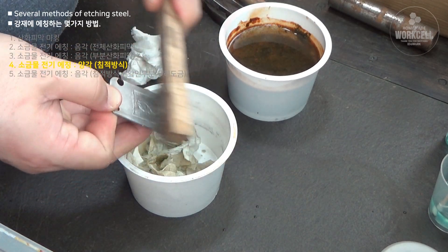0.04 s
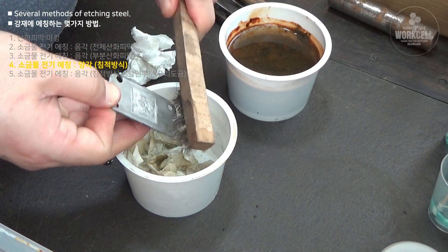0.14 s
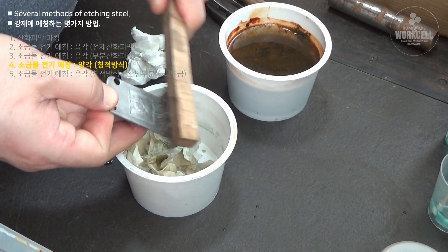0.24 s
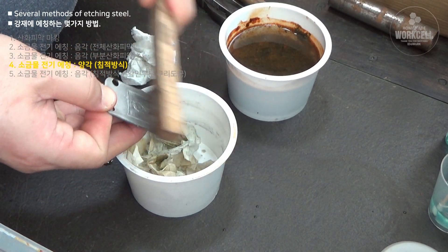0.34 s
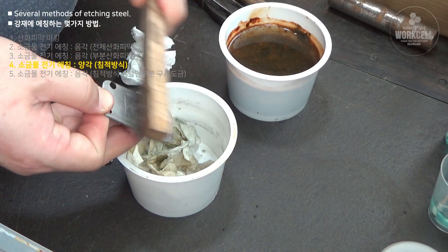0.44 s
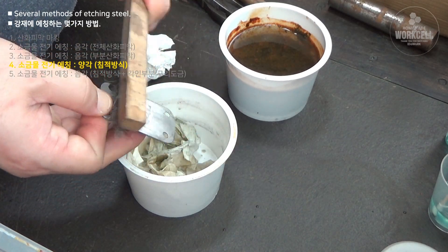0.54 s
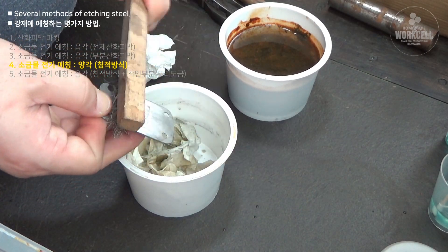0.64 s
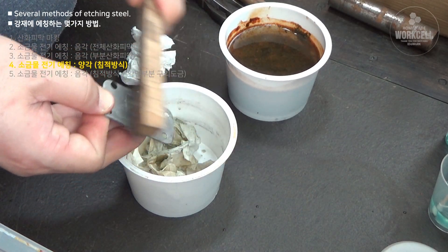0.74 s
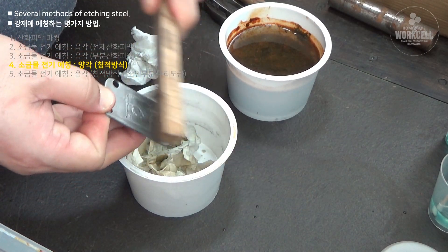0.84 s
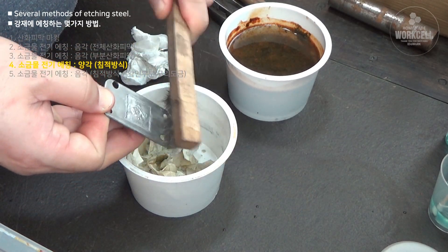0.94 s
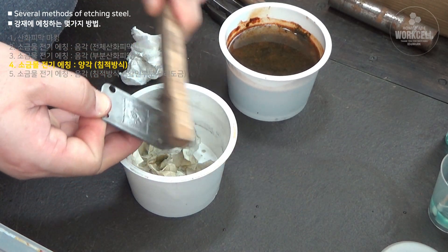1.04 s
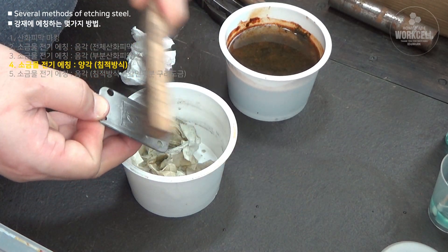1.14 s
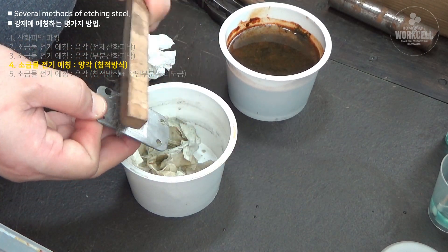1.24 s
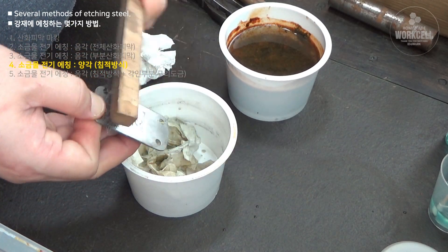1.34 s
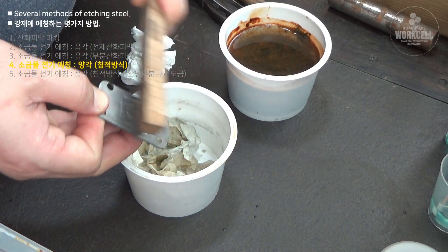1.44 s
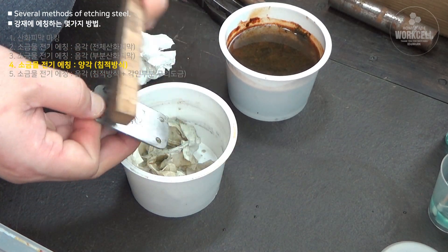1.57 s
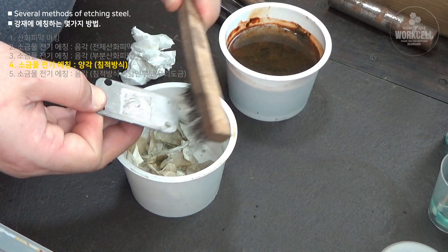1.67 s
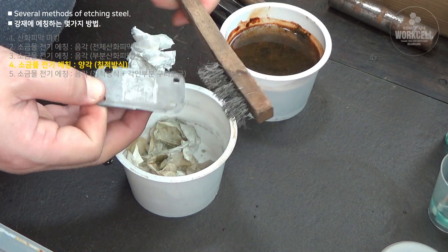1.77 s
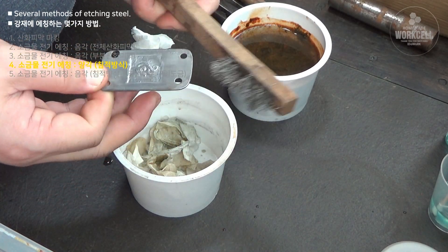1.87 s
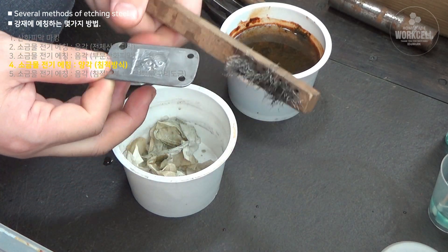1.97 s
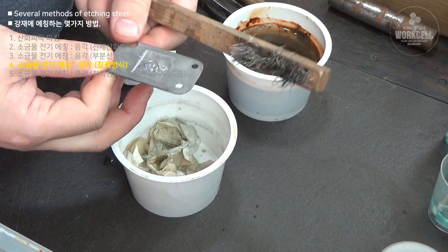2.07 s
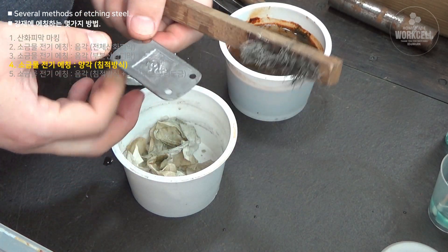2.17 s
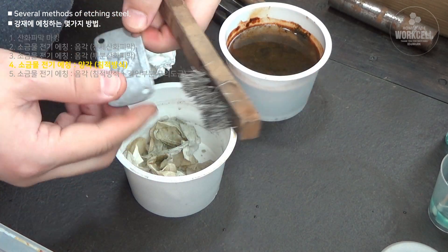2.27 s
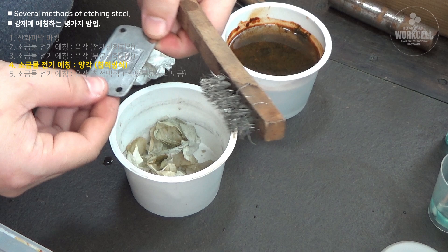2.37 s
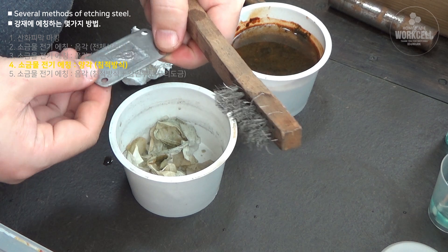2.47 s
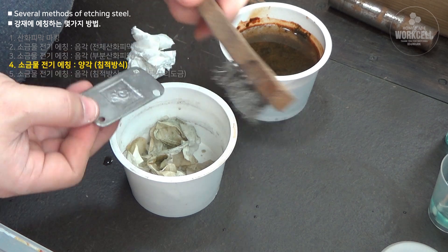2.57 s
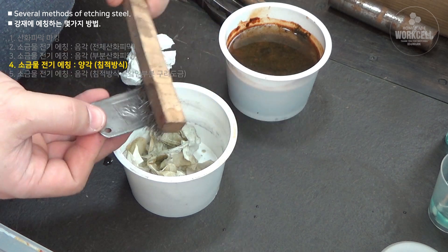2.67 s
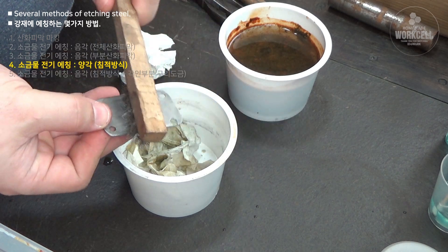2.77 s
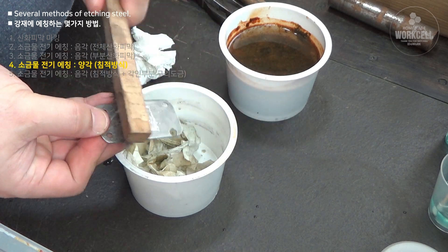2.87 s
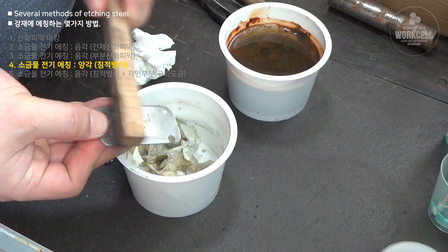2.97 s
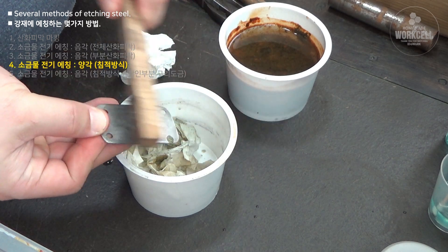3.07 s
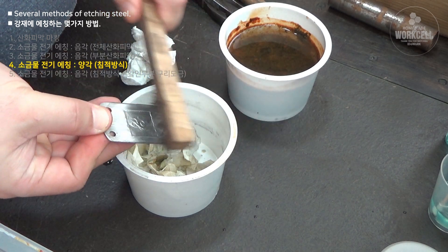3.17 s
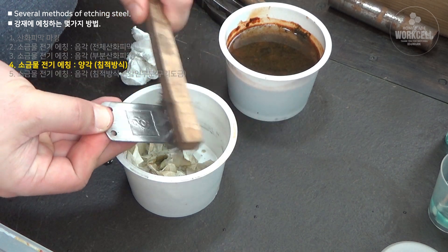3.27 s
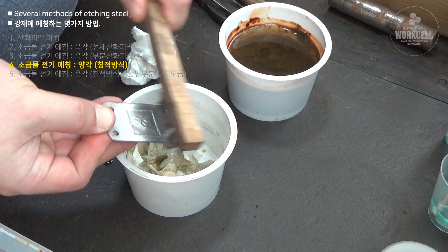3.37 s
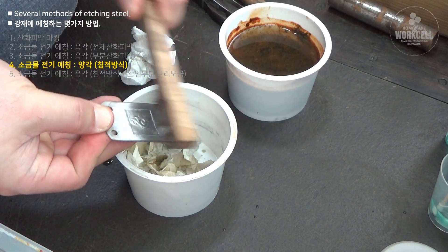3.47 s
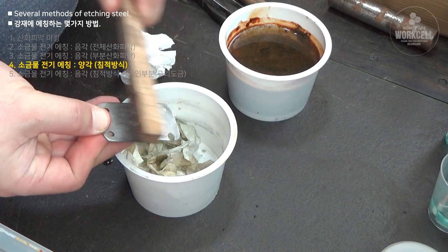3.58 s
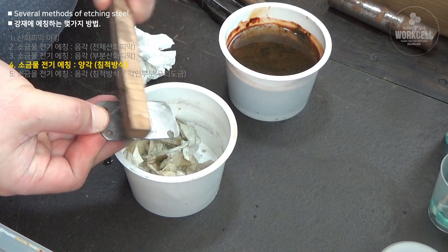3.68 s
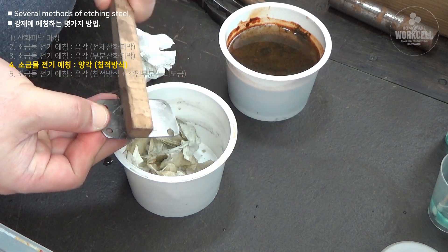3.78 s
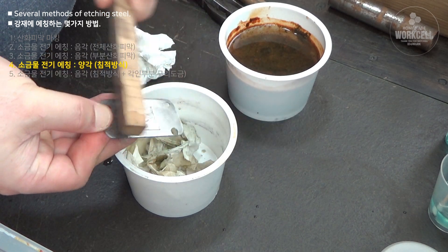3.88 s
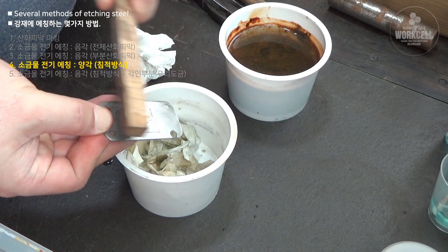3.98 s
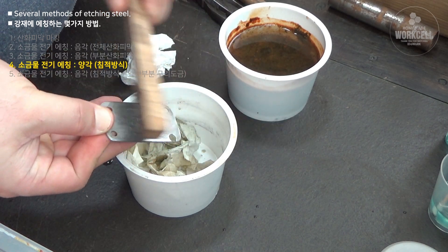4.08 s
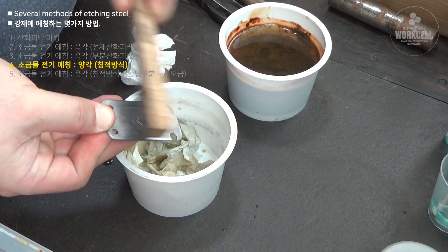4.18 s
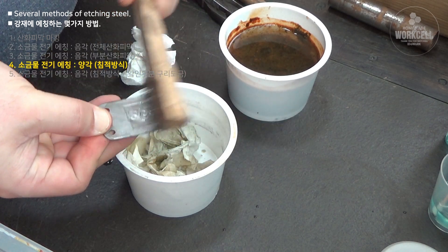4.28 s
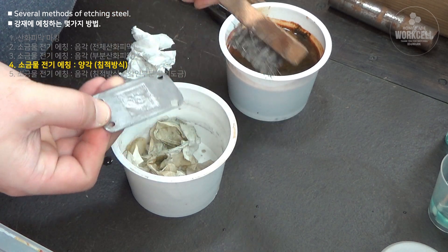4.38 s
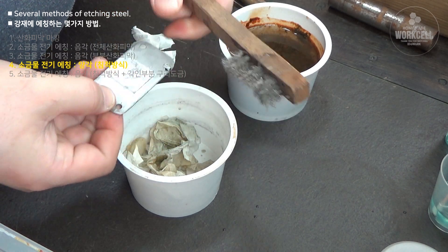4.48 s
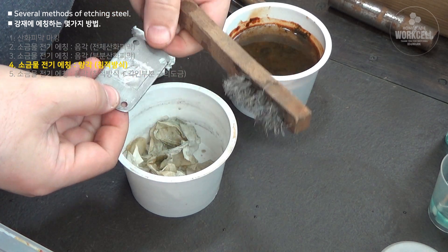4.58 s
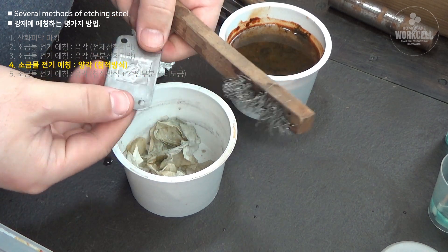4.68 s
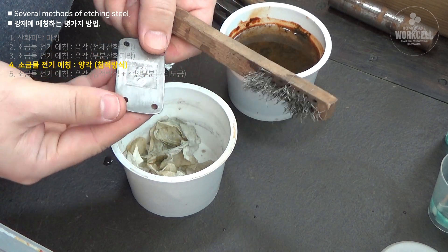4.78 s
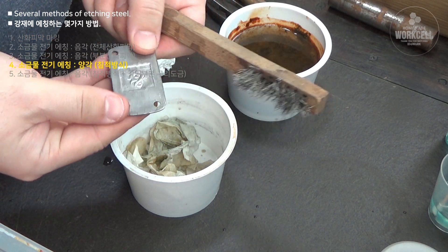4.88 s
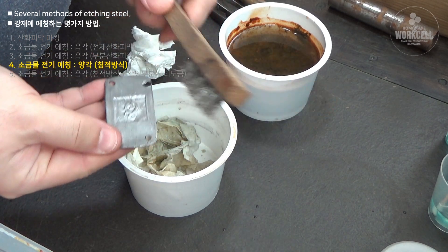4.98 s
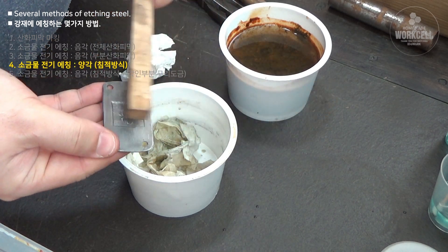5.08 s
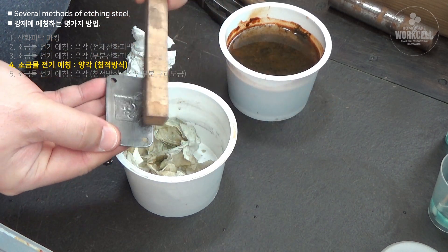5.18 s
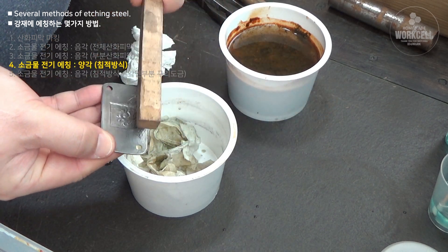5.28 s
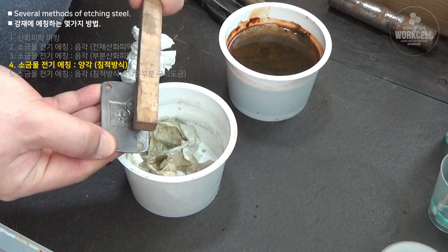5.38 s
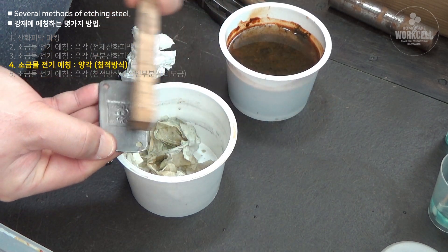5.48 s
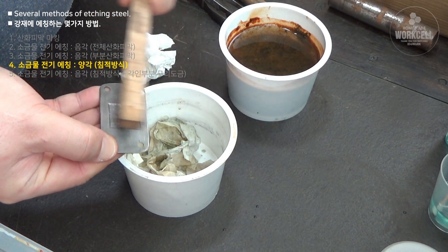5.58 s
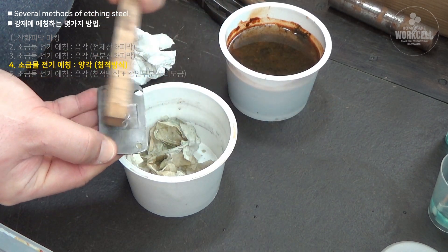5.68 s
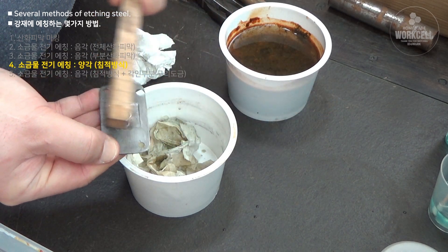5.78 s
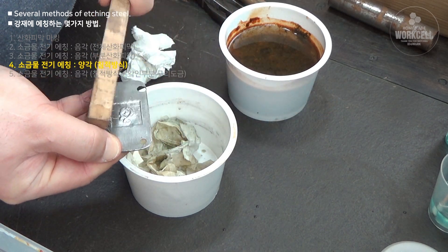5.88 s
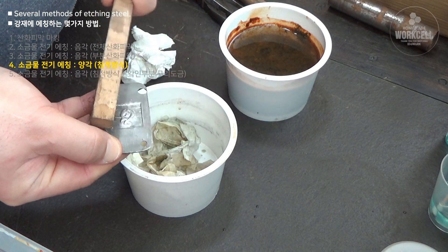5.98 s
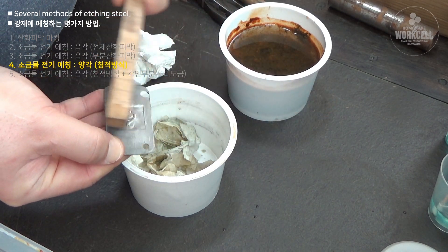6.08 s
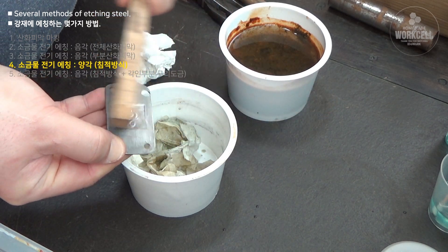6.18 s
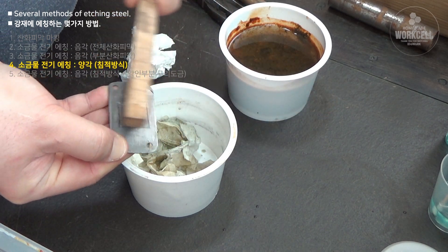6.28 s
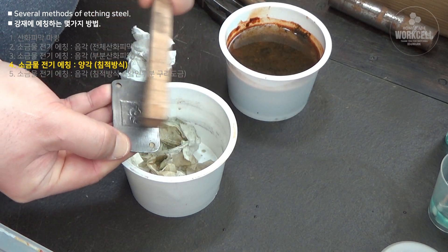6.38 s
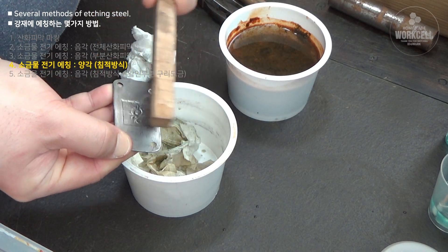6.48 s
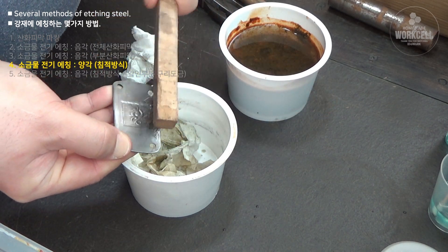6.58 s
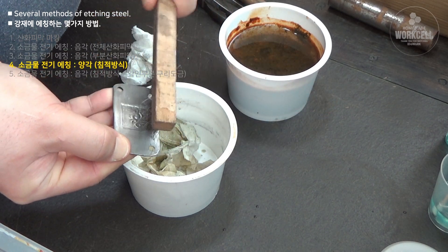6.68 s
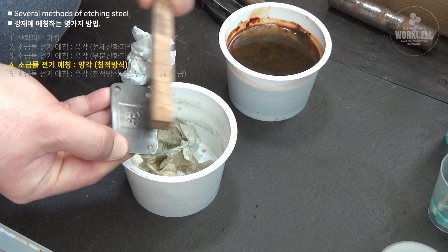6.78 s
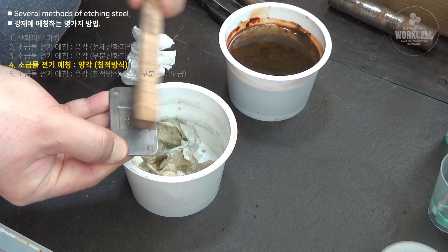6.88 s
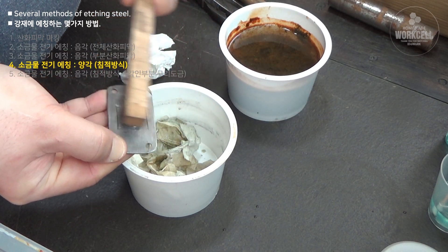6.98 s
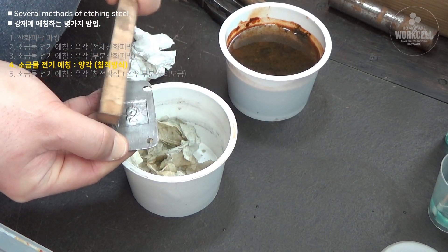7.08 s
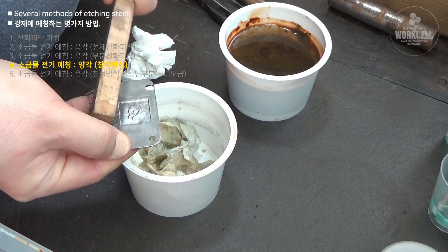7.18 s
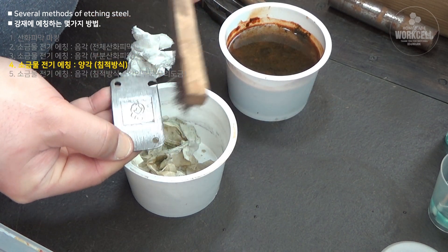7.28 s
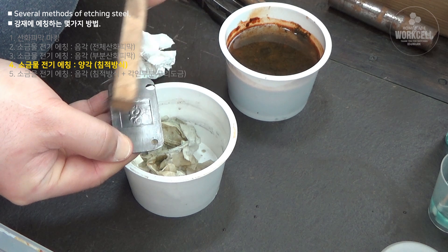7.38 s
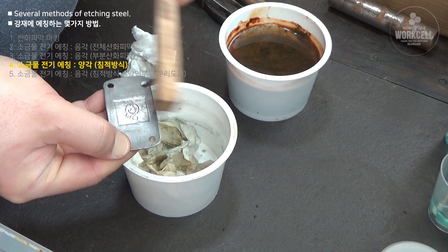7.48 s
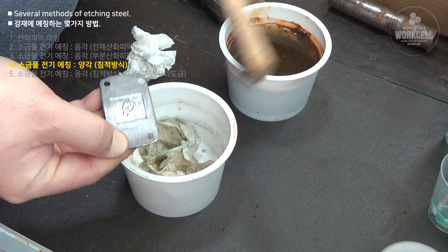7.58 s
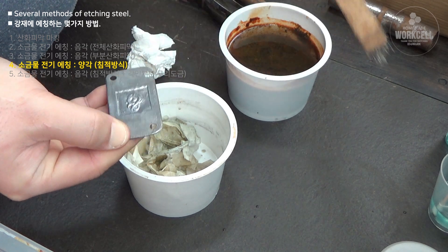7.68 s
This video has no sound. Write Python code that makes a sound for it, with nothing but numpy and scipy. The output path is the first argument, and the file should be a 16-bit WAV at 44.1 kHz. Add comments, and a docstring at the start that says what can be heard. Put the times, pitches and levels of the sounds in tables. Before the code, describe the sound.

In a small, dry workshop, a wire brush scrubs a hand-held steel plate close to the microphone, slightly left. From 0 to 1.7 s, rapid even pushes and pulls, about eighteen strokes a second, make a bright, grainy, sizzling rasp with sharp wire catches. Wires flick as the brush lifts; a tiny motor clicks on near 1.9 s and ticks very faintly to the end. A soft wooden knock comes at 2.5 s, then wire flicks and a thin twang at 2.7 s. Scrubbing resumes from 2.8 to 4.3 s, slightly different in colour. Another pause holds quiet airy hiss, faint hum and a barely audible distant whine, present about 3.7-5.2 s. The third bout runs 5.1 to 7.3 s, with a strong snap near 7.1 s, then two short separate swipes at 7.4 and 7.55 s with light handle taps.

```python
"""Workshop: a wire brush scrubs a small hand-held steel plate in three bouts, about eighteen strokes a second.
Even runs of pushes and pulls; wire tips slip and snap free as clicks, coloured anew by each grip on the plate.
Tuft and free wires ring high; stray wires flick or twang; the handle knocks lightly as damped noise.
Partway in, a tiny motor clicks on and ticks into its resonant housing to the end.
Beneath lie coloured-noise air, a faint hum and, later, a thin far-off whine."""
import sys
import numpy as np
from scipy import signal
from scipy.fft import rfft, irfft
from scipy.io import wavfile
from scipy.ndimage import map_coordinates

SR = 44100
rng = np.random.default_rng(int(sys.argv[2]) if len(sys.argv) > 2 else 0)


def bounce(signal):
    """Save signal as a 16-bit WAV file at the path given by the first command-line argument."""
    frames = np.transpose(np.atleast_2d(signal))
    limited = np.clip(frames, -1, 1)
    pcm = np.round(limited * 32767).astype(np.int16)
    wavfile.write(sys.argv[1], SR, pcm)


N = 340967

# air noise density: freq_hz, rel_density_db
AIR_SPECTRUM = [(30, -52), (100, -15.5), (170, -14), (240, -2.5), (400, -8), (1000, 1), (2000, 0.5),
                (2700, 0.5), (3300, -6), (4800, -7), (6000, -10.5), (9000, -14.5), (15700, -17.5),
                (17000, -26)]
# air level over time: time_s, rel_level_db
AIR_LEVEL = [(0.0, -52.5), (0.04, -58), (0.36, -55), (1.2, -58), (1.46, -54.5), (2.73, -58.5),
             (2.93, -55.5), (2.95, -63), (3.1, -58), (4.52, -55.5), (5.19, -57.5), (5.38, -55.5),
             (6.91, -57), (7.19, -55), (7.23, -60.5), (7.73, -56.5)]
# resonances in the air's rush: freq_hz, width_hz, lift_db
DUCT_MODES = [(249, 64, 6), (431.8, 29, 10), (475, 38, 8.5), (579.2, 20.5, 11), (654, 13, 5.9),
              (1127, 18, 3.5), (1670, 24, 5.5), (1845, 55, 6.5), (2726, 21, 2)]
# room hum: freq_hz, level_db
HUM = [(311, -75)]
# left-right likeness of the air: freq_hz, likeness_0_to_1
LIKENESS = [(60, 1), (380, 1), (950, 0.87), (2380, 0.58), (6000, 0.35), (15000, 0.98)]
# runs of to-and-fro strokes, each from a push: start_s, end_s, stroke_count, rel_level_db, push_over_pull_db,
# push_share_of_cycle, pull_lean (over 1 peaks late), tuft_ring_db, rel_catch_db (wire catch at each push)
RUNS = [(0.008, 0.687, 12, -30, -0.01, 0.52, 0.91, 1.3, -29),
        (0.688, 1.509, 14, -29.5, 0.93, .47, 1.1, 2.3, -23),
        (1.512, 1.621, 2, -29, 0.33, 0.47, 1.07, 2.2, -22), (2.81, 3.145, 6, -31, 1.5, .49, 0.9, 2.5, -25),
        (3.147, 3.986, 15, -30, 0.8, 0.51, 0.98, 0.3, -28),
        (3.985, 4.243, 5, -29.5, 0.5, .47, 1.1, 2.6, -28), (5.115, 5.322, 4, -32.5, 0.97, 0.47, 1, 1, -25),
        (5.322, 5.977, 12, -29.3, 1.7, 0.49, 0.77, 2.8, -29),
        (5.978, 7.062, 20, -29.5, 1.6, 0.46, 0.58, 1.8, -31),
        (7.058, 7.296, 4, -29.7, 0.7, 0.51, 1.04, 2.4, -31)]
# brush landing, leaving, grazing: start_s, length_s, rel_level_db, tuft_ring_db, lean (over 1 peaks late)
LONE_STROKES = [(1.625, 0.076, -28.5, 3, 0.77), (1.825, 0.039, -59, -12, 1), (1.93, 0.07, -60, -7, 1),
                (2.615, 0.052, -59, 0, 1), (2.745, 0.056, -36, 0, 0.67), (4.25, 0.062, -33.5, 1, 0.89),
                (4.356, 0.05, -58, -3, 1), (7.436, 0.054, -28.5, 5.5, 1), (7.554, 0.043, -29.5, 1, 0.84),
                (7.65, 0.1, -59, -10, 1)]
# wires snagging, or flicking as the brush lands and lifts: time_s, rel_level_db
FLICKS = [(0.7024, -17), (1.052, -19), (1.4032, -21), (1.712, -24.5), (1.721, -30), (1.7544, -41),
          (1.8073, -41), (1.8986, -42), (2.709, -32), (2.7197, -40), (3.9943, -17), (4.154, -18),
          (4.209, -30), (4.3405, -38), (4.3854, -36), (5.1048, -21.5), (5.126, -28), (5.165, -22),
          (7.1277, -10), (7.4324, -21), (7.551, -28), (7.7087, -37)]
# friction noise density of the wire tips: freq_hz, rel_density_db
FRICTION_SPECTRUM = [(40, -21.5), (90, -22.5), (135, -16), (300, -30.5), (1500, -19.5), (3000, -16.5),
                     (4200, -11), (5500, -7.5), (8000, -5.5), (10500, -4.5), (13000, 1), (15700, 4),
                     (17000, -3)]
# tuft and plate resonances, first grip: freq_hz, width_hz, lift_db
FIRST_GRIP = [(5282, 649, 5.8), (6700, 1400, 5.3), (8852, 1400, 7.4), (9836, 372, 9.1), (10867, 1400, 11.5),
              (12586, 819, 11.5)]
# second grip, with bass weight: freq_hz, width_hz, lift_db
SECOND_GRIP = [(50, 240, -4), (4121, 625, 3.4), (6322, 914, 5.0), (8002, 1400, 8.5), (9767, 1316, 11.2),
               (11104, 1042, 10.3), (12426, 536, 8.6)]
# third grip, with bass weight: freq_hz, width_hz, lift_db
THIRD_GRIP = [(60, 140, 3), (5173, 474, 5.9), (6400, 690, 4.2), (7734, 545, 3.6), (9984, 1400, 12.7),
              (11271, 1229, 5.8), (12441, 660, 14.0), (14105, 200, 2.3)]
# plate turned in the hand: time_s
REGRIP_S = [2.3, 4.8]
# motor running: time_s, ticks_per_s, level_db
MOTOR_RUN = [(1.92, 55, -68.5), (2.68, 46, -72), (4.35, 48, -69), (5.08, 53, -71.5), (7.7, 31, -69.5)]
# motor housing resonances: freq_hz, rel_level_db, t60_s
HOUSING_MODES = [(4950, 10, 0.035), (6250, 16, 0.027), (6390, 8, 0.035), (6850, 9, 0.033)]
# wooden handle knocks: time_s, rel_level_db, centre_hz
KNOCKS = [(2.501, -40, 1300), (5.71, -41, 1060), (7.434, -47, 595), (7.553, -42, 813)]
# stray wire plucked on the plate's edge: time_s, rel_level_db
PLUCKS = [(2.708, -49), (2.72, -45), (2.752, -38), (4.302, -49)]
# the stray wire's two bending planes: freq_hz, rel_level_db, t60_s
STRAY_WIRE_MODES = [(12600, 0, 0.11), (12770, -3, .11)]
# far-off whine: time_s, pitch_hz, level_db
WHINE = [(3.6, 643, -91), (3.8, 655, -67), (4.2, 658, -70), (4.3, 704, -68), (4.9, 698, -66),
         (5.3, 743, -90)]

TIME_S = np.arange(N) / SR
GRID_HZ = np.maximum(np.fft.rfftfreq(8192, 1 / SR), 1)


def from_db(db):
    """Decibels to amplitude gain."""
    return 10 ** (np.asarray(db) / 20)


def rms_one(x):
    """Scale to rms 1."""
    return x / np.sqrt(np.mean(x ** 2) + 1e-20)


def in_time(rows):
    """Interpolate each column of a time curve at every sample."""
    time_s, *columns = np.transpose(rows)
    return [np.interp(TIME_S, time_s, column) for column in columns]


def at_hz(points, hz):
    """Read a spectrum on a log-frequency axis."""
    point_hz, values = np.transpose(points)
    return np.interp(np.log(hz), np.log(point_hz), values)


def response(spectrum, resonances):
    """Gain on GRID_HZ of a spectrum lifted by resonances; keeps the power of white noise."""
    lift_db = sum(db / (1 + (2 * (GRID_HZ - hz) / width_hz) ** 2) for hz, width_hz, db in resonances)
    return rms_one(from_db(at_hz(spectrum, GRID_HZ) + lift_db))


def colour(x, gain):
    """Minimum-phase filter with the given gain on GRID_HZ, built by folding the cepstrum."""
    cepstrum = irfft(np.log(gain + 1e-9))
    cepstrum[1:len(gain) - 1] *= 2
    cepstrum[len(gain):] = 0
    impulse = irfft(np.exp(rfft(cepstrum)))
    return signal.oaconvolve(x, impulse)[:N]


def drift(rate_hz):
    """Smooth random curve of rms 1: noise through a double pole at about rate_hz."""
    pole = np.exp(-2 * np.pi * rate_hz / SR)
    noise = rng.standard_normal(N + SR)
    return rms_one(signal.lfilter([1], [1, -2 * pole, pole * pole], noise)[SR:])  # skip 1 s settling


def ring(clicks, hz, t60_s):
    """Two-pole resonator: a unit click starts a decaying sine of height 1."""
    radius = np.exp(-np.log(1000) / (t60_s * SR))
    angle = 2 * np.pi * hz / SR
    feedback = [1, -2 * radius * np.cos(angle), radius * radius]
    return signal.lfilter([0, np.sin(angle)], feedback, clicks + 1e-18)


def grains(per_s, spread_db):
    """Random clicks of either sign, their sizes spread exponentially in dB."""
    sizes = from_db(spread_db * np.minimum(rng.exponential(1, N), 4))
    signs = rng.choice([-1, 1], N)
    return sizes * signs * (rng.random(N) < per_s / SR)


def burst(start_s, t60_s):
    """Noise that starts at once and dies away exponentially."""
    age_s = np.maximum(TIME_S - start_s, 0)
    fade = np.exp(-np.minimum(np.log(1000) * age_s / t60_s, 20))
    return rng.standard_normal(N) * (age_s > 0) * fade


def air(trim_db=1.67):
    """Ventilation-like coloured noise, wide in the treble but not at the very top, plus a wavering hum."""
    gain = response(AIR_SPECTRUM, DUCT_MODES)
    alike = np.clip(at_hz(LIKENESS, GRID_HZ), 0, .999)
    mid = colour(rng.standard_normal(N), gain)
    side = colour(rng.standard_normal(N), gain * np.sqrt((1 - alike) / (1 + alike)))
    level_db = in_time(AIR_LEVEL)[0] + trim_db
    out = from_db(level_db) * np.array([mid + side, mid - side])
    for hz, db in HUM:
        phase = 2 * np.pi * np.cumsum(hz + 3 * drift(rate_hz=3.76)) / SR
        out += from_db(db) * np.sqrt(2) * np.sin(phase)
    return out


def strokes(push_lean=1.17, push_ring_db=1.5, uneven_db=0.61, uneven_ring_db=1.4,
            catch_delay_s=.009, catch_spread_db=1.0):
    """Split runs into uneven pushes and pulls; wires catch at each push.

    Strokes: start_s, length_s, level_db, ring_db, lean. Catches: time_s, level_db."""
    moves, catches = list(LONE_STROKES), []
    for start_s, end_s, count, db, push_db, share, pull_lean, ring_db, catch_db in RUNS:
        cycle_s = (end_s - start_s) / (count // 2 + share * (count % 2))
        for k, (harder, brighter, snag) in enumerate(rng.standard_normal((count, 3))):
            at_s = start_s + k // 2 * cycle_s
            if k % 2 == 0:  # push
                length_s, way, lean = share * cycle_s, .5, push_lean
                catches.append((at_s + catch_delay_s, catch_db + catch_spread_db * snag))
            else:
                at_s += share * cycle_s
                length_s, way, lean = (1 - share) * cycle_s, -.5, pull_lean
            level_db = db + way * push_db + uneven_db * harder
            extra_db = ring_db + way * push_ring_db + uneven_ring_db * brighter
            moves.append((at_s, length_s, level_db, extra_db, lean))
    return sorted(moves), catches


def stroke_force(moves, creep_db=-17, saturation=1.233, swell=1.55):
    """Wires only creep at each turn; once sliding, friction grows with speed and levels off."""
    power = np.zeros(N)
    for start_s, length_s, db, _, lean in moves:
        a, b = np.searchsorted(TIME_S, [start_s, start_s + length_s])
        progress = np.clip((TIME_S[a:b] - start_s) / length_s, 0, 1)
        speed = np.abs(np.sin(np.pi * progress ** lean))
        slide = np.tanh(saturation * speed ** swell)
        power[a:b] += from_db(db) ** 2 * (slide ** 2 + from_db(creep_db) ** 2)
    return np.sqrt(power)


def stick_slip(per_s=130, build_s=0.0075):
    """Clumps of wires drag harder and harder, then let go at once; mean 0, rms 1."""
    releases = (rng.random(N) < per_s / SR) + 1e-18
    # filtered backwards in time: load builds up to each release
    load = signal.lfilter([1], [1, -np.exp(-1 / (build_s * SR))], releases[::-1])[::-1]
    load = np.tanh(load)
    return rms_one(load - load.mean())


def flicks(catches, trim_db=-12, t60_s=0.015, rise_s=0.00065):
    """A wire scrapes up to its breaking point, then rattles briefly against its neighbours."""
    starts = np.zeros(N)
    for time_s, db in FLICKS + catches:
        starts[round(time_s * SR)] = from_db(db + trim_db)
    fade = np.exp(-np.log(1000) / (t60_s * SR))
    rise = np.exp(-1 / (rise_s * SR))
    after = signal.lfilter([1], [1, -fade], starts + 1e-18)
    before = signal.lfilter([0, rise], [1, -rise], starts[::-1] + 1e-18)[::-1]
    return (before + after) * rng.standard_normal(N)


def free_wires(drive, hz=12560, half_span_hz=285, t60_s=0.012, count=14, sway_db=10.5):
    """Wires of nearly equal length ring near one pitch; which ones are free keeps changing."""
    total = np.zeros(N)
    for wire_hz in hz + np.linspace(-half_span_hz, half_span_hz, count):
        freedom = rms_one(from_db(sway_db * drift(rate_hz=13.0)))
        total += ring(drive * freedom, wire_hz, t60_s) * rng.choice([-1, 1])
    return total * np.sqrt(4 * np.log(1000) / (count * t60_s * SR))  # offsets ring build-up


def flexing(x, detune=.006, rate_hz=8):
    """Wires bend and unbend: a drifting delay wavers their pitch by roughly the share detune."""
    shift_samples = detune * SR / (2 * np.pi * rate_hz) * drift(rate_hz)
    return map_coordinates(x, [np.arange(N) + shift_samples], order=5)


def tuft_ring(scrub, moves, hz=12550, width_hz=1400):
    """The top resonance sings more or less with the angle of the wires in each stroke."""
    middles = [(start_s + length_s / 2, ring_db) for start_s, length_s, _, ring_db, _ in moves]
    extra_db, = in_time(middles)
    band = signal.lfilter(*signal.iirpeak(hz, hz / width_hz, fs=SR), scrub)
    return (scrub + (from_db(extra_db) - 1) * band) * from_db(-extra_db / 3)  # partly evens the level


def brush(chatter_db=1.1, drag_db=1.57, snap_db=-14, linger_s=0.019, wires_db=-15):
    """Wire tips slip in clumps under the stroke; bent wires go on snapping free through the turns."""
    moves, catches = strokes()
    force = stroke_force(moves)
    grab = from_db(chatter_db * drift(rate_hz=580) + drag_db * stick_slip())
    slips = force * rms_one(grains(per_s=15000, spread_db=3.0) * grab)
    relax = np.exp(-1 / (linger_s * SR))
    bend = signal.lfilter([1 - relax], [1, -relax], force + 1e-18)  # lags the force
    snaps = bend * rms_one(grains(per_s=1400, spread_db=-0.2))
    drive = slips + from_db(snap_db) * snaps + flicks(catches)
    held = np.searchsorted(REGRIP_S, TIME_S)
    scrub = np.zeros(N)
    for k, grip in enumerate([FIRST_GRIP, SECOND_GRIP, THIRD_GRIP]):
        scrub += colour(drive * (held == k), response(FRICTION_SPECTRUM, grip))
    return tuft_ring(flexing(scrub) + from_db(wires_db) * free_wires(drive), moves)


def bench_echoes(x, paths_s, sway_s, echo_db):
    """Near surfaces echo the work; as the hands move the delays shift and comb the hiss anew."""
    echoes = np.zeros(N)
    for path_s in paths_s:
        echoes += np.interp(TIME_S - path_s - sway_s * drift(rate_hz=3.34), TIME_S, x)
    return (x + from_db(echo_db) * echoes) / np.sqrt(1 + len(paths_s) * from_db(echo_db) ** 2)


def workshop(x, t60_s=0.068, gap_s=0.0079):
    """Dense, short reflections from bench and walls: a different decaying noise tail at each ear."""
    age_s = TIME_S[:SR // 2]
    fade = (age_s > gap_s) * np.exp(-np.log(1000) * age_s / t60_s)
    tails = rng.standard_normal((2, len(age_s))) * fade
    return np.array([signal.oaconvolve(x, tail / np.linalg.norm(tail))[:N] for tail in tails])


def motor(start_s=1.921, uneven_db=1.0, limp=0.25, engage_db=-42):
    """Engages with a click, then ticks into its housing's resonances, strong and weak in turn."""
    per_s, level_db = in_time(MOTOR_RUN)
    turns = np.cumsum(per_s * (TIME_S > start_s)) / SR
    ticks = np.diff(np.floor(turns), prepend=0) * (1 + limp * np.cos(np.pi * turns))
    engage = np.zeros(N)
    engage[round(start_s * SR)] = from_db(engage_db) / 2  # shared by the modes
    running, click = np.zeros(N), np.zeros(N)
    for hz, db, t60_s in HOUSING_MODES:
        strikes = ticks * rng.choice([-1, 1], N) * from_db(uneven_db * rng.standard_normal(N))
        running += from_db(db) * ring(strikes, hz, t60_s)
        click += ring(engage, hz, t60_s)
    return from_db(level_db) * rms_one(running) + click


def knocks(breadth=1.33, t60_s=.1, trim_db=7):
    """Dull, well-damped taps of wood: band-passed noise bursts."""
    out = np.zeros(N)
    for time_s, db, hz in KNOCKS:
        band = signal.butter(2, [hz / breadth, hz * breadth], "band", fs=SR, output="sos")
        out += from_db(db + trim_db) * signal.sosfilt(band, burst(time_s, t60_s))
    return out


def plucks():
    """A stray wire twangs as the brush lands or leaves; its two bending planes beat as they decay."""
    clicks = np.zeros(N)
    for time_s, db in PLUCKS:
        clicks[round(time_s * SR)] = from_db(db)
    return sum(from_db(db) * ring(clicks, hz, t60_s) for hz, db, t60_s in STRAY_WIRE_MODES)


def whine(waver_hz=11, flutter_db=3):
    """A thin far-off sine, stepping up overall, unsteady in pitch and level."""
    hz, db = in_time(WHINE)
    level = from_db(db + flutter_db * drift(rate_hz=18))
    phase = 2 * np.pi * np.cumsum(hz + waver_hz * drift(rate_hz=26.0)) / SR
    return level * np.sin(phase)


def scene(room_db=-16, pan_db=.62):
    """Work slightly left with bench echoes, one more echo per ear and room; motor, air and whine added."""
    sources = brush() + plucks() + knocks()
    work = bench_echoes(sources, paths_s=[.0011, .0019, .0031], sway_s=.00004, echo_db=-16.0)
    ears = np.array([bench_echoes(work, paths_s=[path_s], sway_s=.00003, echo_db=-14.5)
                     for path_s in (.0006, .0014)])
    near = ears * from_db([[pan_db], [-pan_db]])
    return near + from_db(room_db) * workshop(work) + motor() + air() + whine()


def record(dry, cutoff_hz=15750):
    """Cut the top steeply with an elliptic low-pass."""
    low_pass = signal.ellip(12, .1, 80, cutoff_hz, fs=SR, output="sos")
    return signal.sosfilt(low_pass, dry)


dry = scene()
out = record(dry)
bounce(out)
```